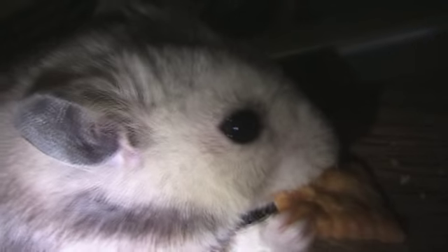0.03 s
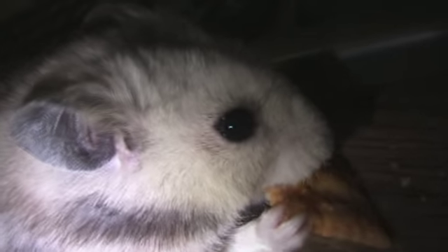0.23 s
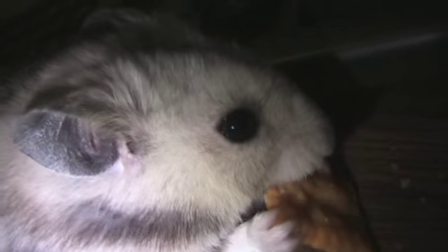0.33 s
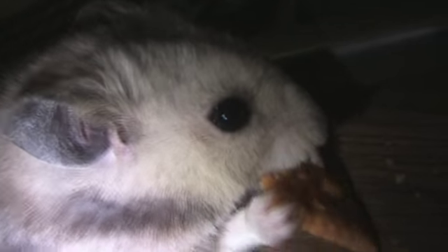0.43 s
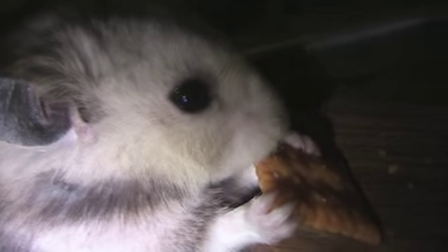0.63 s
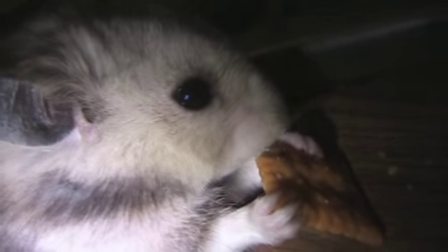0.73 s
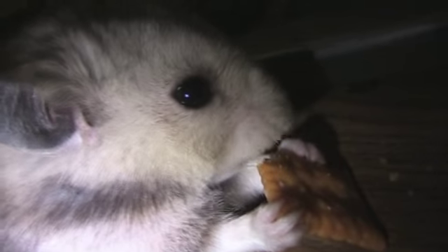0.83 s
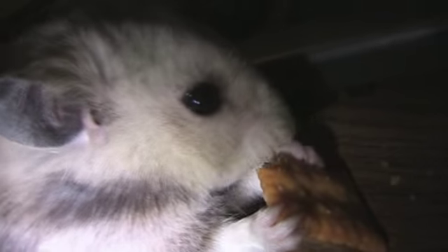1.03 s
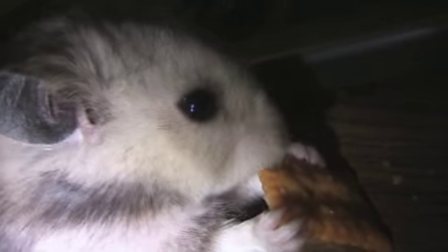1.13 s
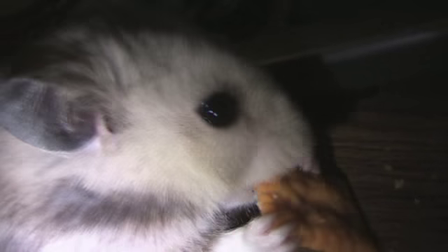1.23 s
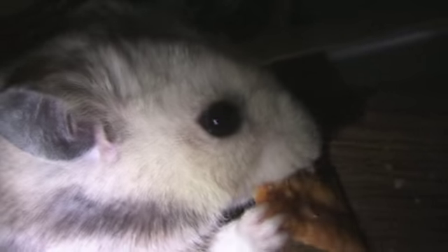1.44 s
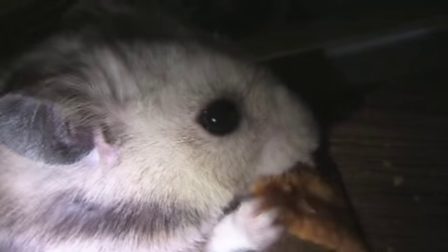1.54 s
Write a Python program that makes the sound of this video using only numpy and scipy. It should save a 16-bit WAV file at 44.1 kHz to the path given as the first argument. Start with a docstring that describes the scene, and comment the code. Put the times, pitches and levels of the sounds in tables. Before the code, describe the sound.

Close crunching of a cracker as a small furry animal bites and nibbles it.

```python
"""A small furry animal gnaws a crisp cracker, close to the microphone in a quiet room.
Crumbs crackle as the jaw presses, teeth rasp and knock dully on the cracker and set it ringing,
and the crust snaps in a few sharp cracks. Later come one soft bump and a thin, high swish.
Nearby surfaces scatter a short tail; under it lie room tone, mains hum and a faint whine."""
import sys
import numpy as np
from scipy import signal
from scipy.fft import rfft, irfft
from scipy.io import wavfile

SR = 44100
rng = np.random.default_rng(int(sys.argv[2]) if len(sys.argv) > 2 else 0)


def wav_record(signal):
    """Record a signal, one row per channel, as 16-bit PCM in the file named by sys.argv[1]."""
    frames = np.transpose(np.atleast_2d(signal))
    bounded = np.clip(frames, -1, 1)
    # unit amplitude maps onto the largest positive 16-bit level
    quanta = np.round(bounded * 32767).astype(np.int16)
    wavfile.write(sys.argv[1], SR, quanta)


N = 70560
SIZE = 8192  # samples in one contact with its tail
AGE, TIME = np.arange(SIZE) / SR, np.arange(N) / SR

# Modes of the held cracker: pitch_hz, level_db, t60_s
CRACKER_MODES = [(580, -46, .035), (847, -8, 0.046), (1106, -4.5, 0.045), (1369, -8.5, 0.072),
                 (1670, 0.5, 0.044), (2218, -7, 0.026), (2930, -21, 0.069), (3330, -4, 0.032),
                 (3943, -3.5, 0.029), (4690, 2, 0.017)]
# Spectrum of a tooth meeting the cracker: frequency_hz, level_db
KNOCK_SPECTRUM = [(170, -33), (400, -5.5), (900, 0.5), (1800, 5.5), (2800, -2.5), (4000, -5), (8000, -28.5),
                  (13000, -76)]
# Spectrum of a brittle fracture: frequency_hz, level_db
SNAP_SPECTRUM = [(150, -34.5), (400, -7), (900, -5.5), (2200, 4), (3400, -4), (5500, 3), (9000, 1.5),
                 (10500, -5.5), (13000, -13.5)]


def undb(db):
    """Decibels to gain."""
    return 10 ** (np.asarray(db) / 20)


def unit(x):
    """Scale to rms 1."""
    return x / np.sqrt(np.mean(x ** 2))


def gains(spectrum, size):
    """A spectrum table spread over the frequency bins."""
    hz, db = np.array(spectrum).T
    bin_hz = np.arange(size // 2 + 1) * SR / size
    return undb(np.interp(np.log(bin_hz + 1), np.log(hz), db))


def click(spectrum):
    """The shortest causal pulse with this spectrum, peak 1."""
    cepstrum = irfft(np.log(gains(spectrum, SIZE)))
    cepstrum[1:SIZE // 2] *= 2
    cepstrum[SIZE // 2 + 1:] = 0
    pulse = irfft(np.exp(rfft(cepstrum)))
    return pulse / np.abs(pulse).max()


def decay(t60_s, rise_s=0):
    """An envelope that falls 60 dB in t60_s, with an optional soft onset."""
    onset = 1 - np.exp(-(AGE / rise_s) ** 2) if rise_s else 1
    return onset * np.exp(-np.log(1000) * AGE / t60_s)


def ring(modes, detune=0.0085):
    """Decaying modes, slightly detuned at each blow."""
    out = np.zeros(SIZE)
    for hz, db, t60_s in modes:
        pitch_hz = hz * (1 + detune * rng.standard_normal())
        out += undb(db) * np.sin(2 * np.pi * pitch_hz * AGE) * decay(t60_s)
    return out


def band(hz, width_hz):
    """Noise in one resonance, rms 1."""
    bin_hz = np.arange(N // 2 + 1) * SR / N
    resonance = 1 / (1 + (2 * (bin_hz - hz) / width_hz) ** 2)
    return unit(irfft(rfft(rng.standard_normal(N)) * resonance, N))


def add(out, start_s, sound):
    """Mix a sound in at a time."""
    i = max(int(start_s * SR), 0)
    part = sound[..., :max(N - i, 0)]
    out[..., i:i + part.shape[-1]] += part


def stereo(mid, side):
    """Left and right from middle and side."""
    return np.array([mid + side, mid - side])


def reflections():
    """Dense scatter from surfaces near the microphone, and the room's longer decay."""
    scatter = undb(-9) * unit(decay(t60_s=0.019, rise_s=0.0011))
    room = undb(-8.5) * unit(decay(t60_s=0.12, rise_s=0.0011))
    return (scatter + room) * rng.standard_normal(SIZE) / np.sqrt(SIZE)


def place(sound, tail_db):
    """A close, centred sound and its reflected tail, widest in the middle range."""
    # Stereo width of the reflections: frequency_hz, side_db
    width = [(200, -10), (1000, -10), (2600, -1.5), (4000, -5.5), (7000, -32), (11000, -8)]
    mid, side = (undb(tail_db) * signal.fftconvolve(sound, reflections())[:SIZE] for _ in range(2))
    side_filter = click(width)
    side_filter *= gains(width, SIZE).max() / np.abs(rfft(side_filter)).max()
    return stereo(sound + mid, signal.fftconvolve(side, side_filter)[:SIZE])


def room_tone():
    """Low rumble and hiss all around the microphone."""
    # Room noise in the middle channel: frequency_hz, level_db
    mid_spectrum = [(20, -22), (44, -19.5), (68, 3.5), (95, -9.5), (135, -4.5), (175, -13.5), (290, -3.5),
                    (450, -11.5), (800, -14.5), (1300, -19.5), (1640, -22), (2000, -35), (2800, -29.5),
                    (4500, -25), (12000, -36)]
    # Room noise in the side channel: frequency_hz, level_db
    side_spectrum = [(15, -42), (25, -31), (80, -3), (306, -4), (555, -6.5), (817, -6.5), (979, -9.5),
                     (1730, -9), (1870, -6), (2180, -13), (3850, -17), (4270, -77), (12000, -67),
                     (15600, -97), (22000, -120)]
    mid, side = (unit(irfft(rfft(rng.standard_normal(N)) * gains(spectrum, N), N))
                 for spectrum in (mid_spectrum, side_spectrum))
    return undb(-53.5) * stereo(mid, undb(-2.5) * side)


def mains_hum():
    """The mains hums in three steady low tones."""
    # Partials of the hum: pitch_hz, rms_db
    partials = [(120.5, -65), (240.5, -61), (361.5, -64)]
    return sum(np.sqrt(2) * undb(db) * np.sin(2 * np.pi * (hz * TIME + rng.random()))
               for hz, db in partials)


def whine(centre_hz=4100, sweep_hz=2606, pulses_per_s=35):
    """A faint, unevenly pulsing whine, heard only in the middle of each rising sweep."""
    cycle = np.cumsum(pulses_per_s * (1 + 0.13 * band(0, width_hz=8))) / SR % 1
    pitch_hz = centre_hz + sweep_hz * (cycle - .5)
    pulses = np.sin(np.pi * cycle) ** 30
    return undb(-59.5) * np.sin(2 * np.pi * np.cumsum(pitch_hz) / SR) * pulses


def crumbs(per_s=220, spread_db=4):
    """Tiny random fractures while the jaw presses."""
    # Strength of the crumbling between the teeth: time_s, level_db
    crumbling = [(0, -41), (.05, -40.5), (.13, -40.5), (.2, -43), (.32, -47.5), (.38, -41.5), (.5, -36.5),
                 (.6, -48), (.7, -44.5), (.8, -51), (1.0, -85), (1.07, -44.5), (1.13, -66), (1.36, -43.5),
                 (1.6, -78.5)]
    breaks = rng.random(N) < per_s / SR
    size_db = spread_db * (np.minimum(rng.standard_normal(N), 1.5) - 1)
    fractures = breaks * undb(size_db + np.interp(TIME, *np.array(crumbling).T))
    grain = click(KNOCK_SPECTRUM) + undb(-5) * click(SNAP_SPECTRUM) + undb(-20) * ring(CRACKER_MODES)
    return signal.fftconvolve(fractures[None], place(grain, tail_db=3), axes=1)[:, :N]


def tooth_rasp():
    """Teeth scrape along the crust: a narrow band of noise, strongest at the first bite."""
    # Strength of the scraping: time_s, level_db
    scraping = [(0, -50.5), (.14, -56), (.22, -68), (.33, -68)]
    return band(1880, width_hz=320) * undb(np.interp(TIME, *np.array(scraping).T))


def cracker_ring(centre_hz, db_per_octave=8.5):
    """The cracker's modes; the place of the bite favours those near one pitch."""
    return ring([(hz, db - db_per_octave * abs(np.log2(hz / centre_hz)), t60_s)
                 for hz, db, t60_s in CRACKER_MODES])


def tooth_knocks():
    """Teeth close on the cracker: a soft pulse with a sharp edge and a ring."""
    # Tooth contacts: start_s, level_db, edge_db, ring_db, ring_centre_hz
    knocks = [(0.0387, -30.5, -1, -22, 1580), (.0480, -30.5, -2.5, 6.5, 1740), (0.0529, -24, -7, 10, 1580),
              (0.0577, -26, -16, -31, 1180), (0.065, -41, -23, 16, 1600), (.0739, -41, 8.5, -11, 2000),
              (0.0999, -32.5, -4.5, -24, 1600), (0.1448, -21, -4, -2.5, 1570), (.3660, -23, -10, -20, 1800),
              (.3770, -34, 0, 0, 1600), (0.3867, -23.5, -15, 0.5, 1730), (.5979, -18.5, -5.5, 8, 890),
              (0.5999, -17, -9.5, 8.5, 1970), (.9011, -46.5, -12, 15, 1590), (1.0745, -47, 0, -3, 1400),
              (1.1612, -40, -16, 11.5, 1490), (1.2493, -32, -28, -12, 1000), (1.2530, -38.5, -22, 12, 1820),
              (1.3430, -43.5, -7, 11, 1600), (1.3529, -39.5, -8, 1, 2010), (1.4071, -26, -18, -4, 1650),
              (1.408, -27.5, -9.5, 7.5, 1760), (1.4508, -36.5, -6.5, 7, 1600),
              (1.4594, -37, -10, 13.5, 1280), (1.4854, -41, -14, 3, 1600), (1.5800, -44.5, -24, 5, 1070),
              (1.5932, -21, -11, 4.5, 1400)]
    out = np.zeros((2, N))
    push, edge = click(KNOCK_SPECTRUM), click(SNAP_SPECTRUM)
    for start_s, db, edge_db, ring_db, centre_hz in knocks:
        # A weaker edge means a softer, duller contact.
        cutoff_hz = np.clip(9000 * 2 ** (edge_db / 15.5), 1000, 15000)
        muffle = signal.butter(2, cutoff_hz, fs=SR, output="sos")
        contact = place(signal.sosfilt(muffle, push) + undb(edge_db) * edge, tail_db=3)
        body = undb(ring_db - 15) * signal.sosfilt(muffle, cracker_ring(centre_hz))
        add(out, start_s, undb(db) * (contact + body))
    return out


def crust_snaps(chip_t60_s=0.0049, splinter_low_hz=2850):
    """Each fracture is a sharp pulse with bright splinters; the chip pings and the cracker rings."""
    # Fractures of the crust, each with the two modes of its breaking chip:
    # start_s, level_db, low_hz, low_db, high_hz, high_db, ring_db, ring_centre_hz, tail_db
    snaps = [(.1770, -32.5, 2540, 3, 5300, 7, 14.5, 1600, 3),
             (0.2165, -48, 4530, -11, 7400, -4, -5, 1588, 12),
             (0.2297, -5, 5080, -4.5, 7400, -1, 8.5, 1230, -5),
             (0.4148, -34.5, 4000, -13, 7500, 9, -9, 1600, 1),
             (0.4302, -6, 2000, -30, 5740, 5.5, 8, 1460, -2),
             (.4355, -2.5, 2800, -2, 5230, -2, -39, 1820, -3),
             (0.4395, -14.5, 910, -12, 4600, 9, -2, 860, 5.5),
             (0.4792, -19.5, 2450, -2, 5500, 2, 4, 1190, -8),
             (0.4883, -28, 2000, -2, 7500, -10, -17, 1600, 0),
             (.4941, -36, 5000, 1, 7500, 2, -20, 1600, -6),
             (0.5043, -12.5, 2360, -19, 4360, -0.5, -21, 2200, -3),
             (.5100, -20.5, 6660, -11, 6860, 8, -19, 1600, 13.5),
             (.5426, -3, 860, -26, 6700, 2.5, -3, 1400, -0.5)]
    out = np.zeros((2, N))
    crack = click(SNAP_SPECTRUM)
    bright = signal.sosfilt(signal.butter(2, splinter_low_hz, "high", fs=SR, output="sos"), crack)
    for start_s, db, low_hz, low_db, high_hz, high_db, ring_db, centre_hz, tail_db in snaps:
        burst = unit(decay(t60_s=0.0028, rise_s=0.0004) * rng.standard_normal(SIZE)) / np.sqrt(SIZE)
        splinters = undb(2) * signal.fftconvolve(bright, burst)[:SIZE]
        chip = undb(-7) * ring([(low_hz, low_db, chip_t60_s), (high_hz, high_db, chip_t60_s)])
        body = undb(ring_db - 27) * cracker_ring(centre_hz)
        add(out, start_s, undb(db) * (place(crack, tail_db) + splinters + chip + body))
    return out


def bump(start_s=1.1948, right_lag_s=0.00011):
    """One soft, low bump off to the left, reaching the right channel a little later."""
    # Spectrum of the dull impact: frequency_hz, level_db
    spectrum = [(60, -29.5), (250, -3.5), (480, 7.5), (900, -7), (1300, -21.5), (3000, -40), (13000, -65)]
    body = ring([(483, -13, 0.0095), (590, -12, 0.019), (895, -11.5, 0.017)])
    left, right = undb(-27.5) * place(click(spectrum) + body, tail_db=-4)
    out = np.zeros((2, N))
    add(out[0], start_s, left)
    add(out[1], start_s + right_lag_s, right)
    return out


def swish(peak_s=1.232, half_length_s=0.0056):
    """A thin, high wisp of noise swells and is gone."""
    swell = np.exp(-((TIME - peak_s) / half_length_s) ** 2)
    return undb(-54.5) * band(11200, width_hz=2700) * swell


def scene():
    """Close gnawing in front of the quiet room."""
    background = room_tone() + mains_hum() + whine()
    gnawing = crumbs() + tooth_rasp() + tooth_knocks() + crust_snaps()
    return background + gnawing + bump() + swish()


def record(dry):
    """The recorder cuts the treble above 12.2 kHz."""
    return signal.sosfilt(signal.ellip(8, .2, 70, 12200, fs=SR, output="sos"), dry)


dry = scene()
out = record(dry)
wav_record(out)
```